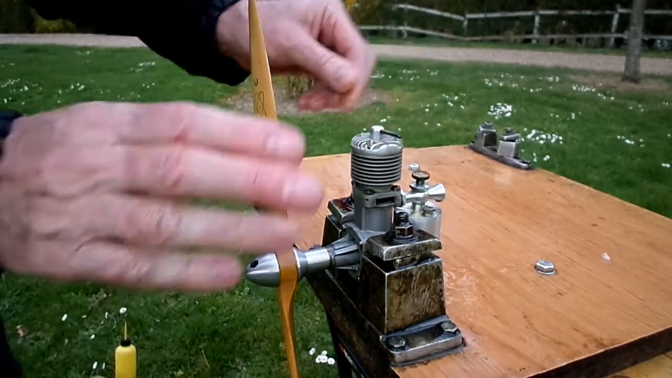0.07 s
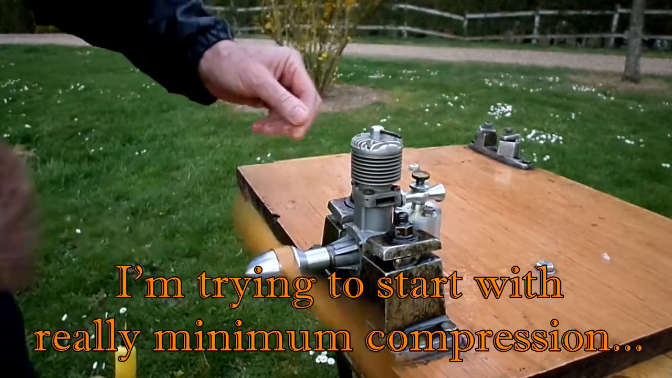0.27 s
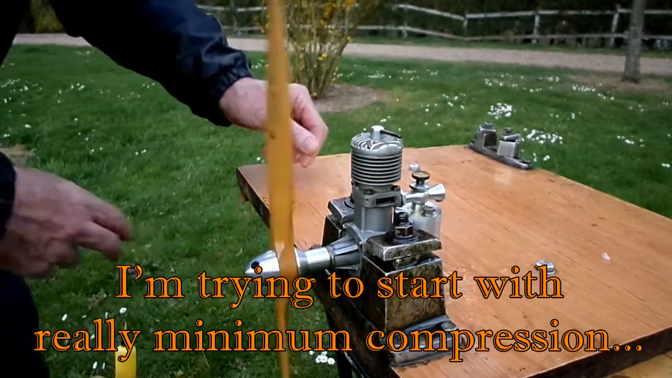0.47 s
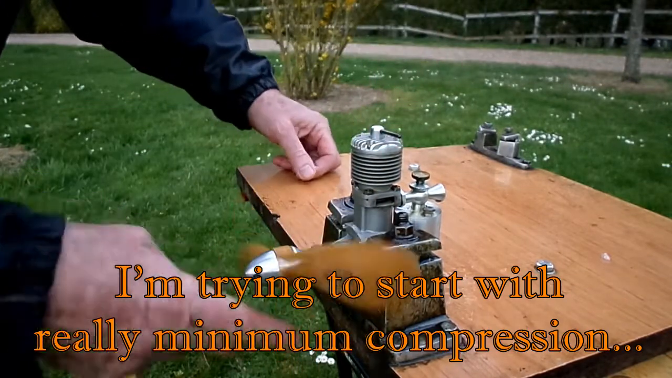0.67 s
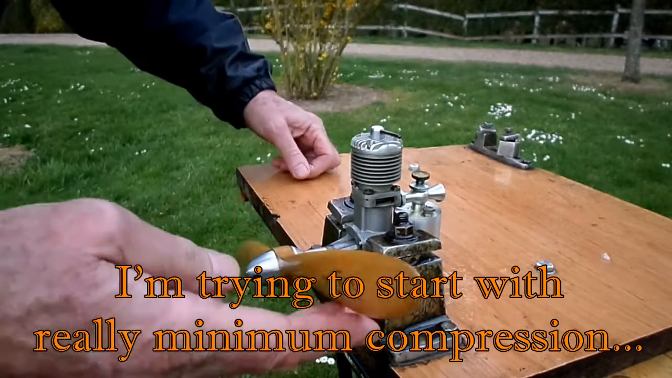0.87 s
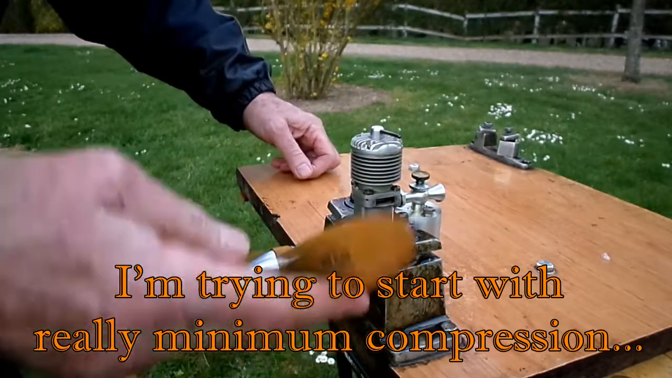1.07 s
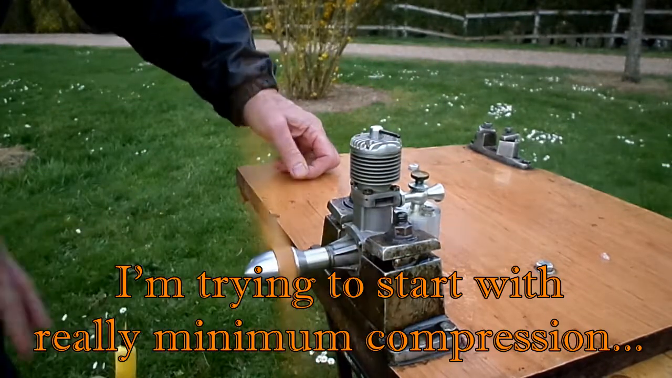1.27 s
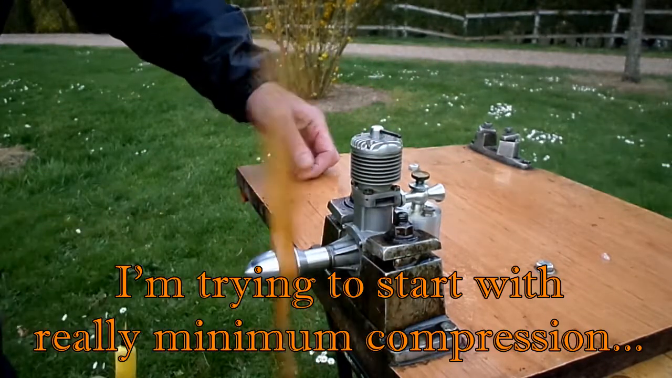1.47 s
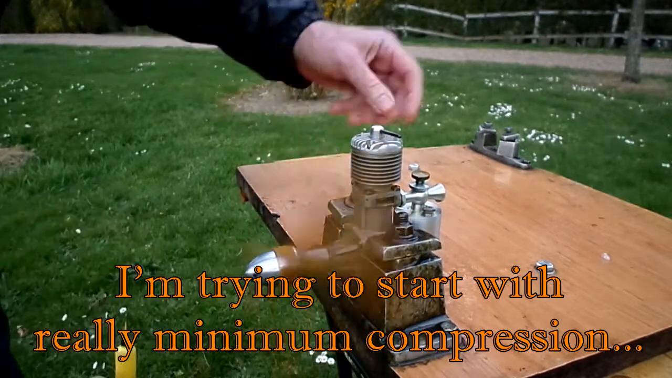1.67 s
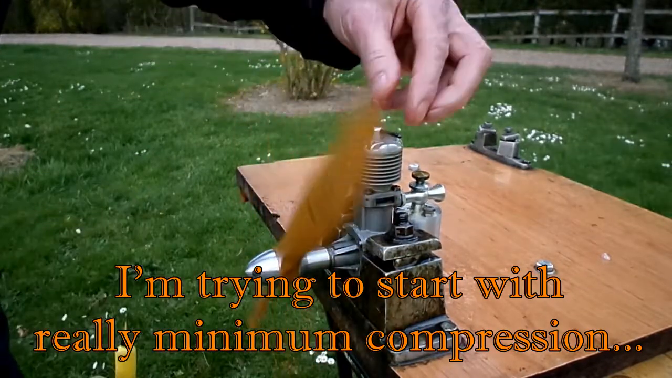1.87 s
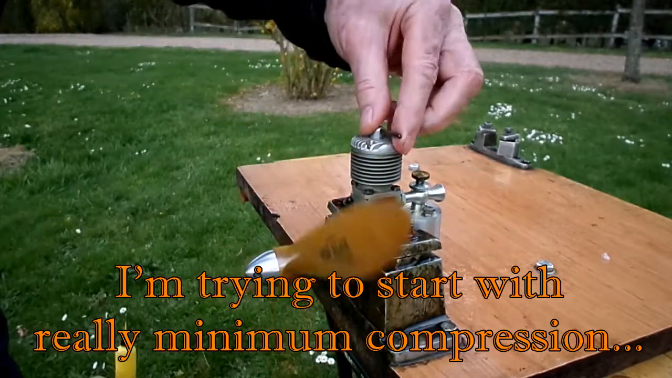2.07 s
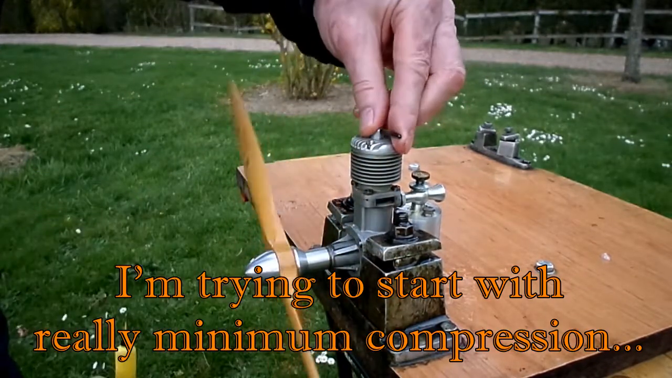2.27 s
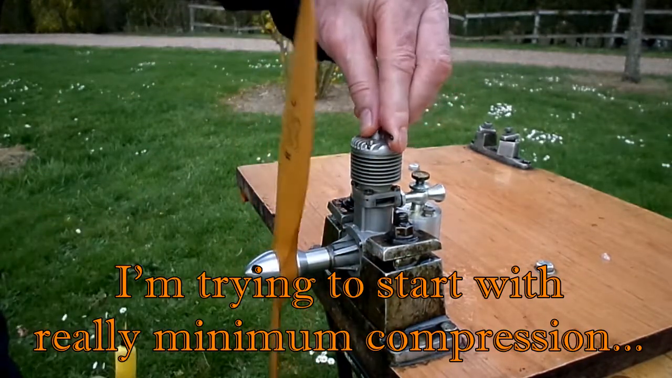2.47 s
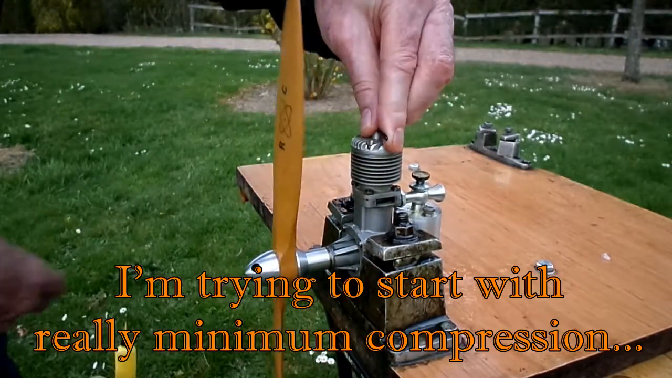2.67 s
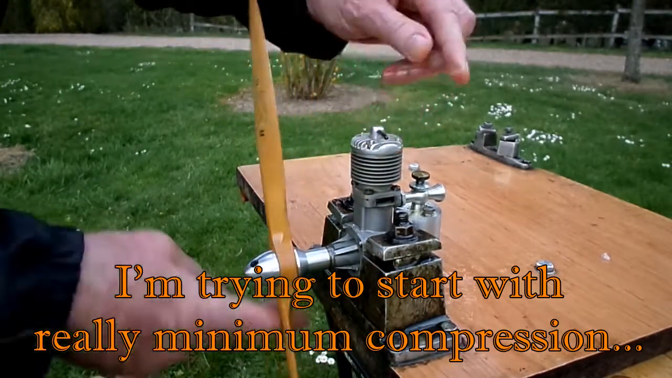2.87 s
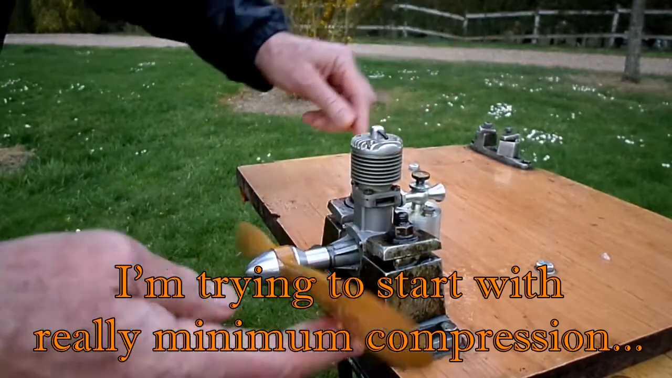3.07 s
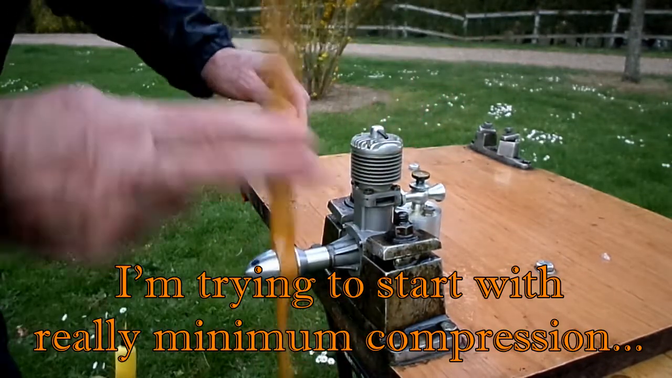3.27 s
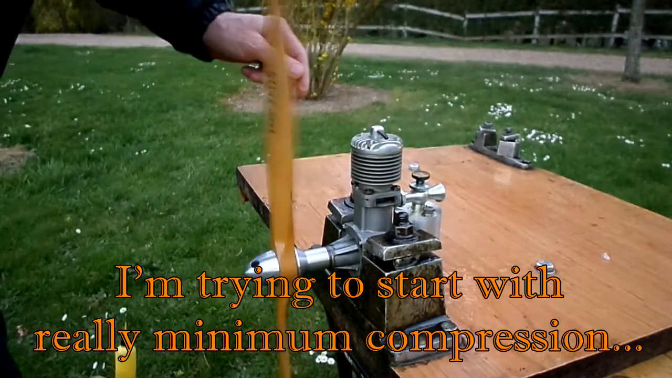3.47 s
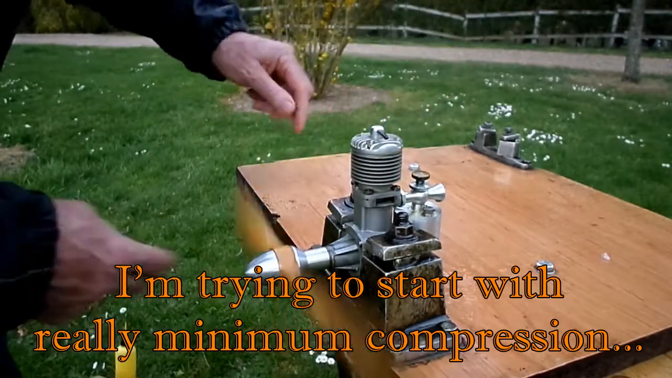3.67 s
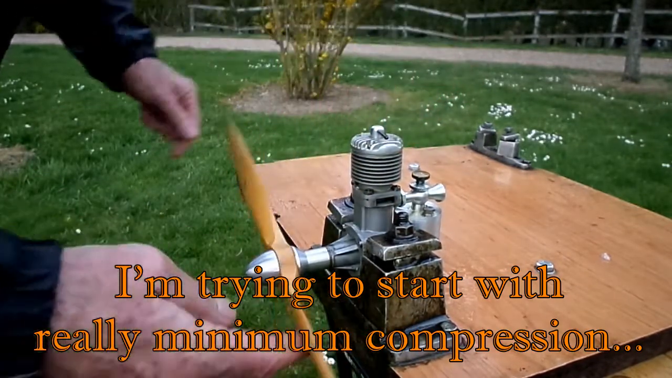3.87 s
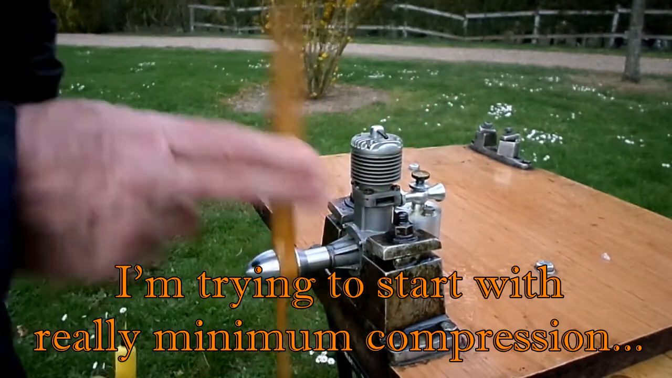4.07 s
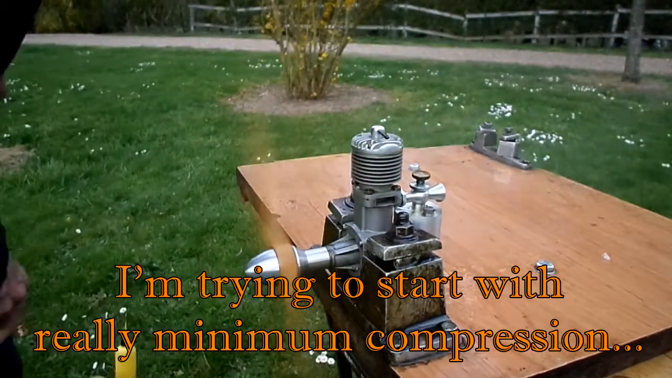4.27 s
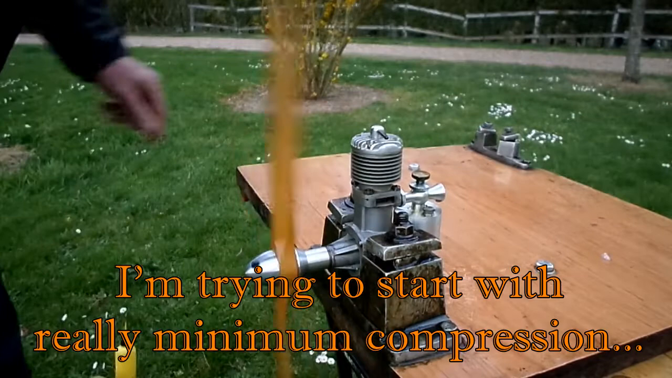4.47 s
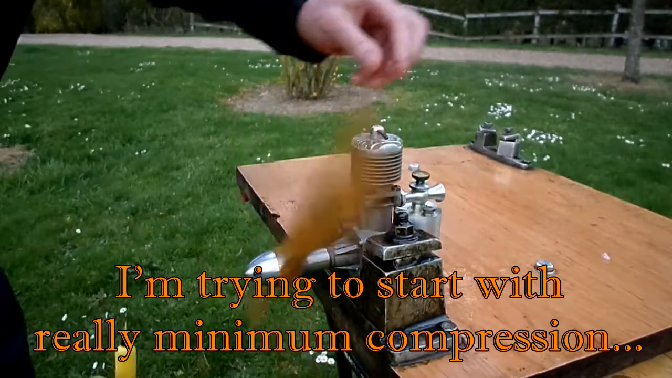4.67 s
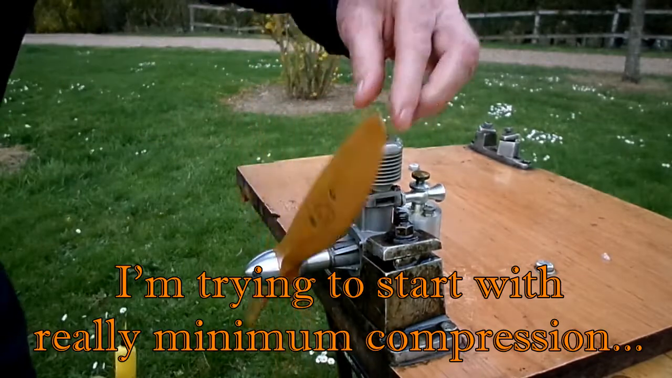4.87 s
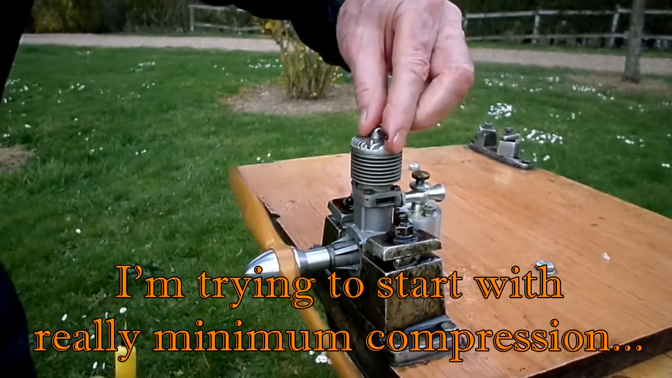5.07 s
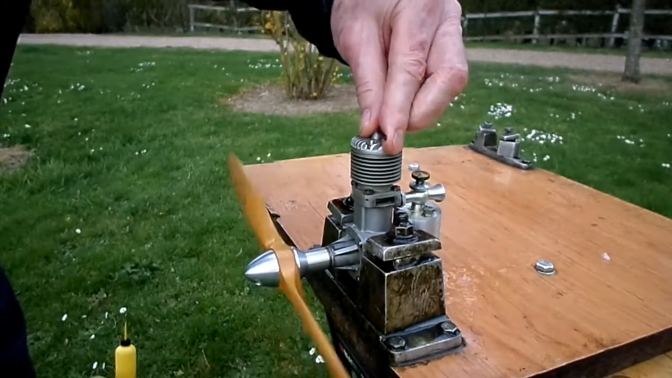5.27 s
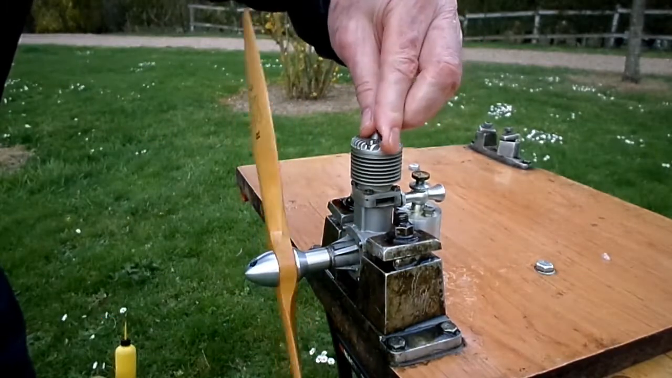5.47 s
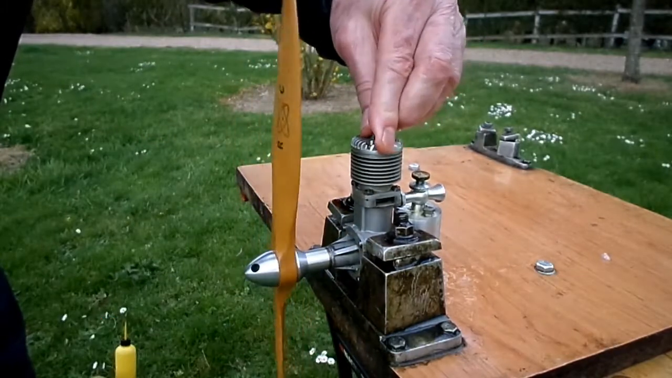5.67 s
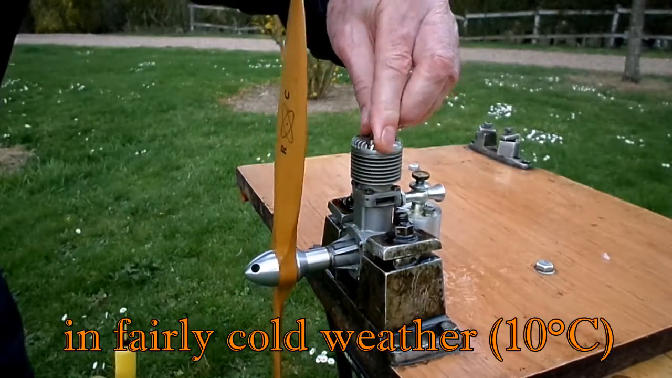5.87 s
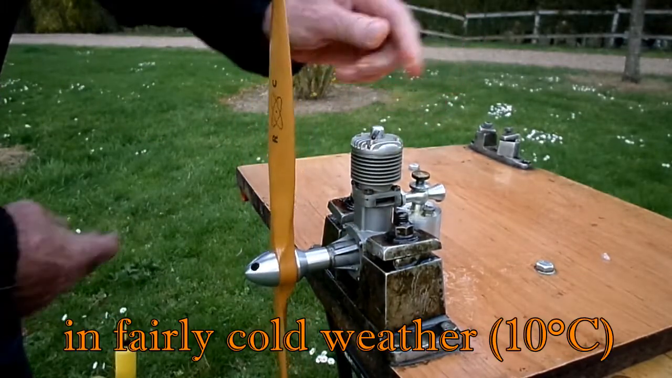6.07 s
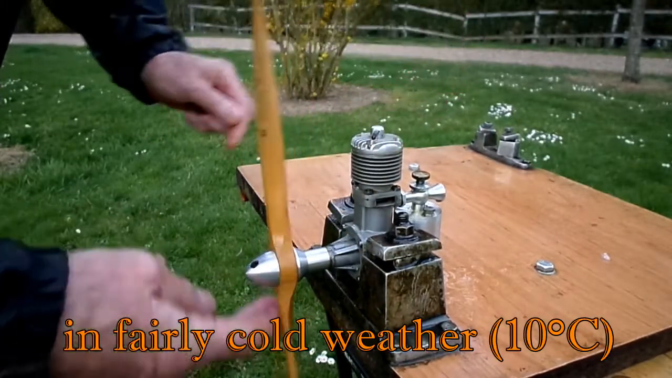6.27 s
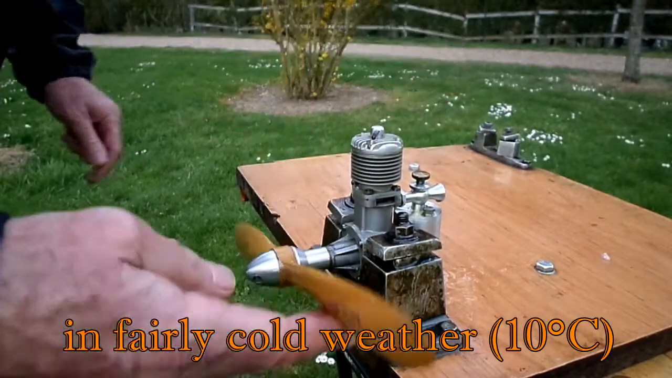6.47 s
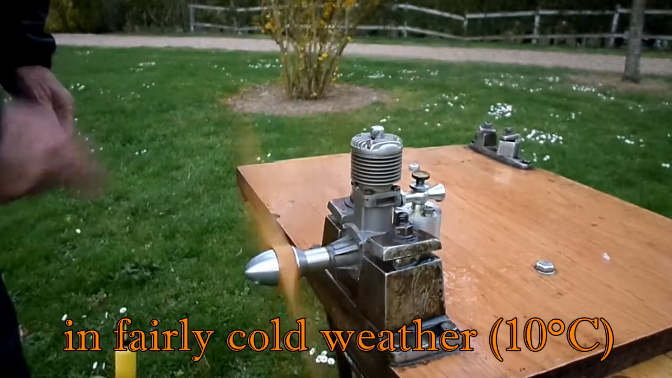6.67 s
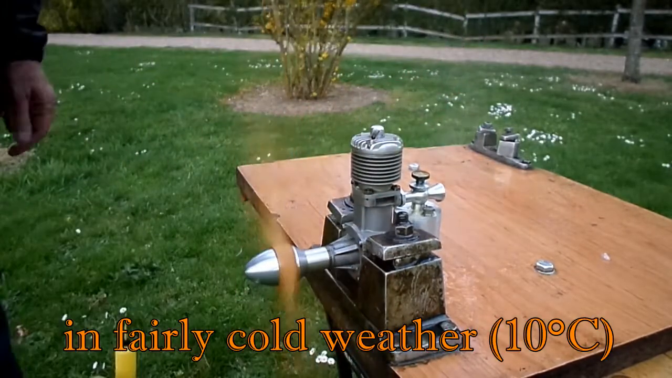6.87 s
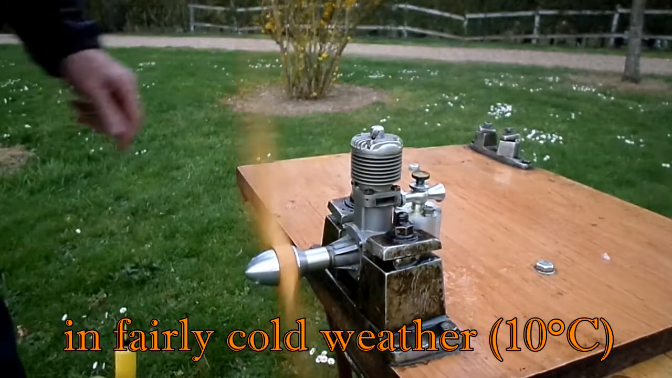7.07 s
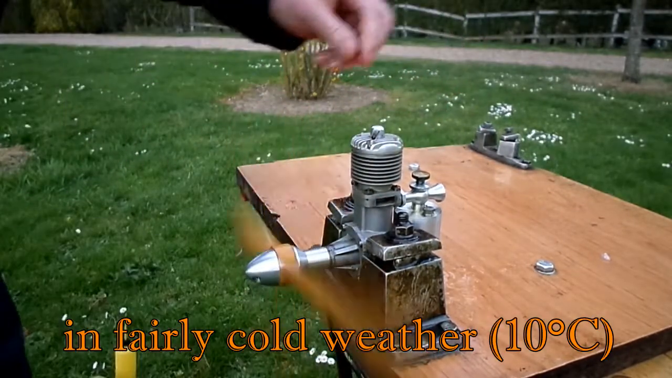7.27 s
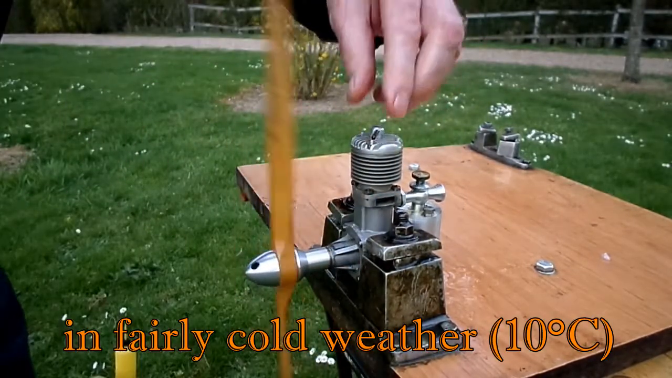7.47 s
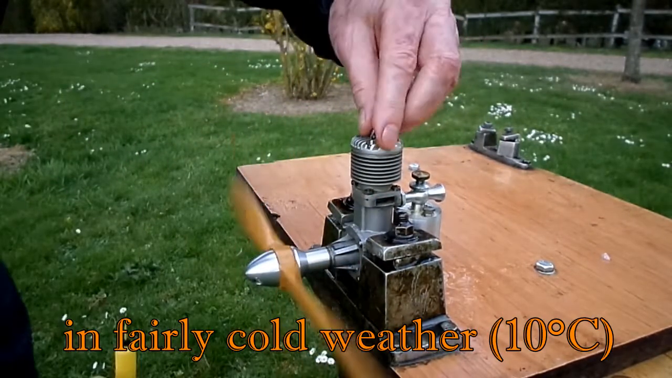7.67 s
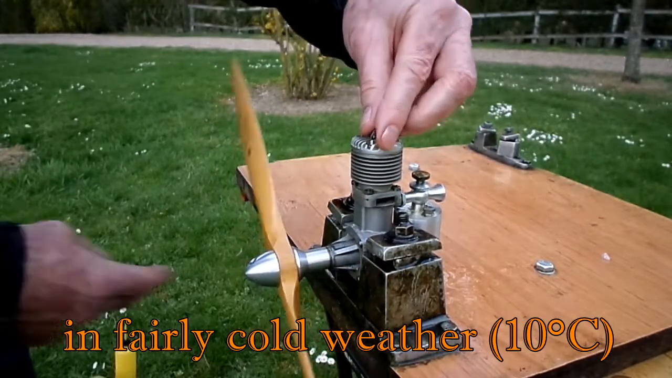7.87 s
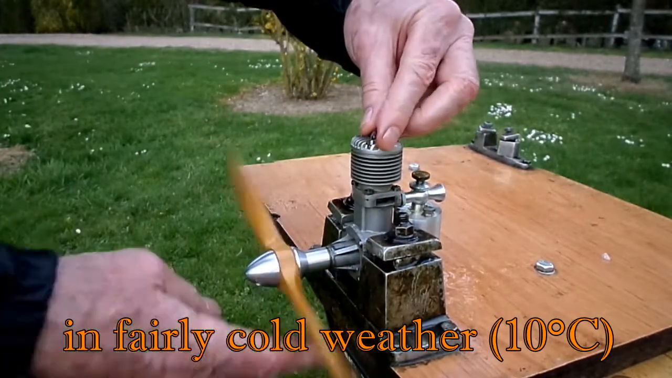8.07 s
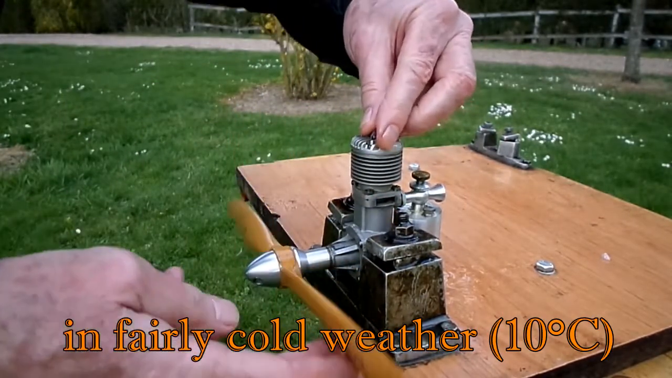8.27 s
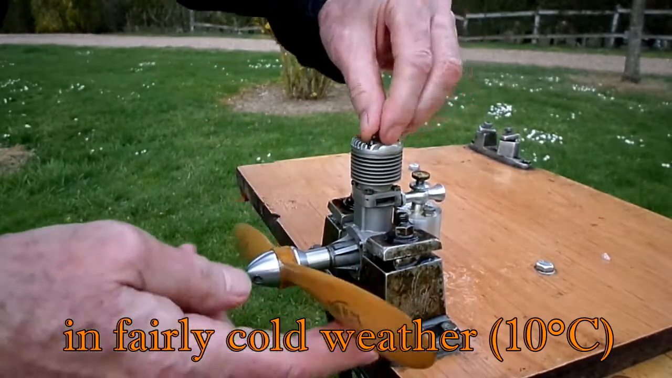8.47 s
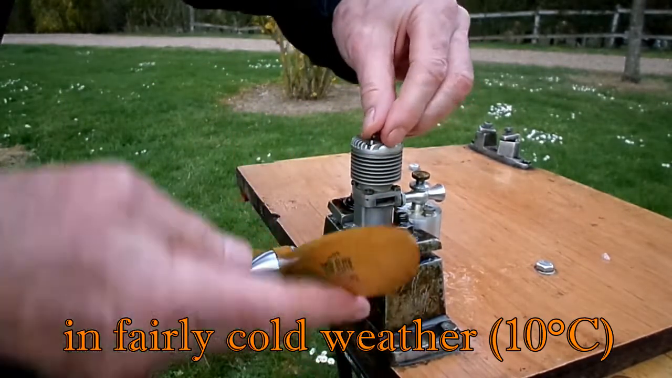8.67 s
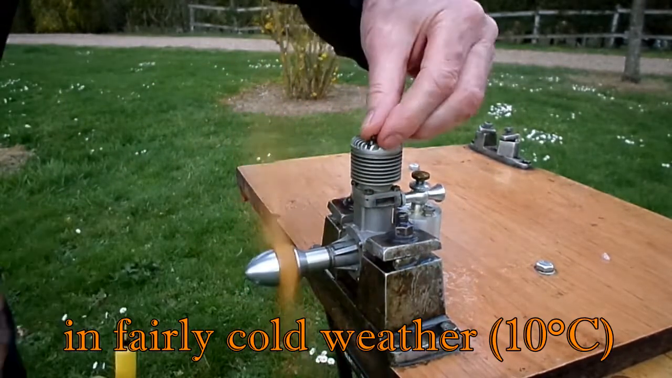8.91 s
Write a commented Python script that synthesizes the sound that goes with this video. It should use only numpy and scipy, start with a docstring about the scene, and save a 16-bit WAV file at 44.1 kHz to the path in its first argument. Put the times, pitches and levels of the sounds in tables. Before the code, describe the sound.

Outdoors in a quiet garden, a close microphone hears a small model engine on a wooden table. At first there are sleeve swishes, light finger knocks and metal ticks over a soft murmur and distant birds. At 1.2 s a flick gasps and fires about six hard, bright cracks, speeding up, then slackens into pops and whirr until about 1.7. Quiet, with a faint far drone around 3. At 3.35 a knock and one sharp bang, running down weakly. At 4.15 a stronger blade knock and seven rapid cracks, coasting out by 4.65. A pause has faint bird whistles, a clear one near 6, and sleeve rustle. At 6.65 the longest burst, fourteen fast cracks with propeller buzz, slows by 7.3 amid heavy low wind thumps. Near silence follows until a final gasp and burst at 8.8, cut off at about 8.9 while still firing.

```python
"""Hand-starting a small model engine

A model diesel on a wooden table in a garden is flicked by hand five times, firing for one to fourteen turns.
The intake gasps and the open exhaust cracks; after four of the starts the wooden propeller coasts down.
Fingers knock the blade, metal ticks, a nylon sleeve swishes, birds and a drone sound far off, and air buffets
the microphone. Shaped noise makes gas, cloth and wind; fading sines ring; a turn-by-turn crank times the engine."""
import sys
import numpy as np
from scipy import signal
from scipy.fft import rfft, irfft
from scipy.io import wavfile
from scipy.ndimage import uniform_filter1d

SR = 44100
rng = np.random.default_rng(int(sys.argv[2]) if len(sys.argv) > 2 else 0)


def waveform_to_disk(signal):
    """Save audio, clipped to [-1, 1], as 16-bit WAV at the path in sys.argv[1]."""
    frames = np.transpose(np.atleast_2d(signal))
    scaled = np.clip(frames, -1, 1) * 32767
    samples = np.round(scaled).astype(np.int16)
    wavfile.write(sys.argv[1], SR, samples)


N = 394254
TIME = np.arange(N) / SR
# time since the onset of a short sound (s)
AGE = np.arange(4096) / SR


# Levels in the tables are relative: a function may trim them as it mixes its layers.


def undb(db):
    """Turn decibels into gain."""
    return 10 ** (np.asarray(db) / 20)


def curve(rows):
    """Gain over time, drawn through rows of time_s, level_db."""
    return undb(np.interp(TIME, *np.transpose(rows)))


def noise(colour, size):
    """Noise of rms 1, its spectrum shaped by rows of frequency_hz, level_db."""
    hz, db = np.transpose(colour)
    bins_hz = np.fft.rfftfreq(size, 1 / SR)
    gain = undb(np.interp(np.log(bins_hz + 1), np.log(hz), db))
    x = irfft(rfft(rng.standard_normal(size)) * gain, size)
    return x / x.std()


def band(x, hz, kind, order=2):
    """Butterworth filter that keeps one part of the spectrum."""
    edges_hz = np.minimum(hz, SR / 2 - 100)
    return signal.sosfilt(signal.butter(order, edges_hz, kind, fs=SR, output="sos"), x)


def walk(rate):
    """Random wander: straight lines between random points, at this many points per second."""
    return np.interp(TIME * rate, np.arange(N // 10), rng.standard_normal(N // 10))


def swells(rows, rest_db):
    """Gain of swells that rise and fall evenly in dB, added as power over a resting level."""
    power = undb(rest_db) ** 2
    for peak_s, db, rise_s, fall_s in rows:
        drop = np.maximum((peak_s - TIME) / rise_s, (TIME - peak_s) / fall_s)
        power = power + undb(db - 20 * drop) ** 2
    return np.sqrt(power)


def sized(x, db):
    """Give a short sound the energy of 5 ms at this rms level."""
    return x * undb(db) / np.sqrt(np.sum(x ** 2) / (.005 * SR))


def fade(t60):
    """Exponential decay that drops 60 dB in t60 seconds."""
    return np.exp(-np.log(1000) * AGE / t60)


def ring(hz, t60):
    """One struck mode: a sine that dies away."""
    return np.sin(2 * np.pi * hz * AGE) * fade(t60)


def add(out, s, x):
    """Mix x into out, starting at s seconds."""
    i = max(int(s * SR), 0)
    out[i:i + len(x)] += x[:max(N - i, 0)]


def n_wave(length, edge_hz):
    """A pressure jump that falls through zero to a suction and snaps back, softened above edge_hz."""
    return band((1 - 2 * AGE / length) * (AGE < length), edge_hz, "low")


def jet(rise, t60):
    """Gas noise that builds as a port opens and then dies away."""
    # colour of rushing gas: frequency_hz, level_db
    gas_colour = [(300, -28), (1000, -9), (2200, -10), (4500, -10), (7000, -5.5), (9000, -3), (11000, 6),
                  (12500, -4.5), (15000, -12.5), (17000, -27)]
    return noise(gas_colour, len(AGE)) * (1 - np.exp(-(AGE / rise) ** 2)) * fade(t60)


def table_shake():
    """Stand and table top ring after a blow; pitch varies least in the low modes."""
    # modes of stand and table top: pitch_hz, level_db, t60_s
    wood_modes = [(140, -4.5, .07), (228, 0.5, 0.028), (370, -2.5, 0.031), (432, -9, 0.033),
                  (640, -33.5, 0.049), (710, -16, 0.035), (863, -3, .04), (1246, -15.5, 0.043),
                  (1750, -2, 0.017), (1930, 0, 0.022)]
    out = np.zeros(len(AGE))
    for hz, db, t60 in wood_modes:
        gain = undb(db + 2.1 * rng.standard_normal())
        out += gain * ring(hz * (1 + hz / SR * rng.standard_normal()), t60)
    return out


def garden():
    """Far outdoor murmur and a soft hiss behind it: two coloured noises with slowly moving levels."""
    # colour of the murmur: frequency_hz, level_db
    murmur_colour = [(20, 2.5), (120, 1), (250, -8), (400, -10), (1000, -9), (1600, -14), (3000, -19),
                     (6000, -26.5), (11000, -28), (15500, -34.5)]
    # murmur level over time, in groups: time_s, level_db
    murmur_level = [
        [(0.0, -55), (0.604, -57), (0.89, -60), (1.15, -60)],
        [(1.68, -71), (2.24, -70), (2.96, -57), (4.08, -56)],
        [(4.62, -67), (5.148, -68), (6.24, -54), (6.6, -55)],
        [(7.36, -76), (7.544, -78), (8.488, -71), (8.72, -67)],
    ]
    # level of the soft far hiss over time: time_s, level_db
    far_hiss_level = [(4.3, -86), (5, -75.5), (7, -73), (7.4, -95), (7.9, -76), (8.3, -75), (8.65, -66),
                      (8.94, -66)]
    hiss_colour = [(300, -27), (1000, 1), (1700, -0.5), (2800, -8.5), (6000, -25), (15000, -47)]
    # raised by 6 dB, with a small wander
    murmur = noise(murmur_colour, N) * curve(np.vstack(murmur_level)) * undb(6 + 1.1 * walk(8))
    return murmur + noise(hiss_colour, N) * curve(far_hiss_level)


def wind():
    """Air on the microphone: a low rumbling noise with single eddies as short bursts on top."""
    # colour of the rumble: frequency_hz, level_db
    wind_colour = [(15, 0), (35, -2), (70, -5.5), (130, -16), (250, -29.5), (600, -50), (2000, -102.5)]
    # strength of the breeze over time, in groups: time_s, level_db
    breeze_level = [
        [(0.0, -58), (1.46, -56), (1.82, -72), (3.2, -56)],
        [(4.6, -59), (5.728, -51), (5.978, -47), (6.4, -48)],
        [(6.5, -44), (6.614, -37), (7.194, -38), (7.3, -48)],
        [(7.38, -51), (7.996, -59), (8.356, -59), (8.94, -44)],
    ]
    # eddies that hit the microphone: centre_s, level_db, half_length_s, upper_edge_hz
    buffets = [(3.09, -45, 0.049, 204), (4.961, -34, 0.022, 118), (5.179, -35, 0.026, 128),
               (6.526, -28.5, 0.049, 120), (6.552, -32, 0.04, 98), (6.619, -27.5, 0.039, 128),
               (7.03, -23.5, 0.036, 360), (7.105, -22.5, 0.025, 340), (7.157, -23.5, 0.025, 262),
               (7.227, -22, 0.019, 398), (7.254, -19.5, 0.013, 442), (7.297, -13, 0.021, 345),
               (7.514, -24.5, 0.019, 480), (8.525, -37.5, 0.02, 180), (8.623, -37.5, 0.023, 200),
               (8.761, -18.5, 0.0047, 279)]
    out = noise(wind_colour, N) * curve(np.vstack(breeze_level)) * undb(1.8 + 1.9 * walk(10))
    for centre_s, db, half_s, hz in buffets:
        t = np.arange(-2 * half_s, 2 * half_s, 1 / SR)
        swell = np.exp(-(t / (0.71 * half_s)) ** 2)
        eddy_colour = [(hz / 10, -6), (hz / 2.8, 0), (hz * .8, -6), (hz * 1.7, -25), (hz * 5, -65),
                       (hz * 30, -100)]
        # the core of the eddy is faster and reaches higher
        core_colour = [(hz / 2, -15), (hz, 0), (hz * 2, -9), (hz * 4.25, -24), (hz * 9, -55), (hz * 30, -80)]
        eddy = noise(eddy_colour, len(t)) * swell
        core = noise(core_colour, len(t)) * swell ** 4
        gust = (eddy + undb(-11) * core) / eddy.std()
        add(out, centre_s - 2 * half_s, gust * undb(db - 6.5))
    return out


def birds():
    """Birds far off: gliding, trilling sine whistles, smeared by the trees on their way."""
    # bird notes: start_s, end_s, start_hz, middle_hz, end_hz, level_db, warble (share of pitch)
    bird_notes = [(0, 0.136, 2330, 2380, 2180, -53, 0.028), (0.6, 0.814, 2270, 2450, 2300, -54, 0.02),
                  (0.91, 1.17, 1666, 1700, 1730, -64, 0.0092),
                  (2.171, 2.335, 1700, 1970, 1836, -67, 0.0056),
                  (2.397, 2.57, 2410, 2380, 2320, -59.5, 0.027),
                  (3.664, 3.772, 2090, 2030, 1950, -53, .005), (3.89, 4.02, 2380, 2400, 2170, -52.5, 0.011),
                  (4, 4.112, 2220, 2110, 2060, -48, 0.04), (4.82, 4.924, 2150, 2510, 2400, -63.5, 0.0084),
                  (4.88, 5.1, 2300, 2320, 2390, -61.5, 0.16), (5.032, 5.255, 1700, 1967, 1950, -66, .005),
                  (5.234, 5.29, 4730, 4600, 4550, -64.5, .003), (5.27, 5.445, 3240, 3350, 3340, -69, .005),
                  (5.331, 5.693, 2227, 2300, 2354, -62.5, .012),
                  (5.454, 5.483, 2760, 2885, 2830, -63, 0.0033),
                  (5.465, 5.546, 4420, 4320, 4440, -54.5, 0.0021),
                  (5.602, 5.803, 1800, 1740, 1780, -59, 0.049),
                  (5.658, 5.73, 3700, 4800, 6860, -68.5, 0.0043),
                  (5.719, 5.856, 6150, 5420, 5860, -62.5, .004),
                  (5.909, 6.176, 2690, 2563, 2580, -49.5, 0.0035)]
    out, quaver, swell = np.zeros(N), walk(160), walk(40)
    for start_s, end_s, first_hz, middle_hz, last_hz, db, warble in bird_notes:
        now = (TIME >= start_s) & (TIME < end_s)
        progress = np.linspace(0, 1, now.sum())
        glide = np.polyfit([0, .5, 1], [first_hz, middle_hz, last_hz], 2)
        # a fast, slightly uneven trill of 60 beats a second rides on the glide
        trill = np.sin(2 * np.pi * 60 * TIME[now]) + .4 * quaver[now]
        hz = np.polyval(glide, progress) * (1 + warble * trill)
        loudness = np.sqrt(np.abs(np.sin(np.pi * progress))) * undb(db + 2 * swell[now])
        out[now] += np.sin(np.cumsum(2 * np.pi * hz / SR)) * loudness
    t = TIME[:SR // 2]
    trees = rng.standard_normal(len(t)) * (np.exp(-t / .012) + .25 * np.exp(-t / 0.12))
    echoes = signal.fftconvolve(out, trees / np.linalg.norm(trees))[:N]
    return .85 * out + .55 * echoes


def sleeve():
    """A nylon sleeve swishes with arm movements: cloth-coloured noise with an uneven level."""
    # colour of the cloth: frequency_hz, level_db
    cloth_colour = [(300, -27), (1500, -12), (4000, -11), (6500, -7.5), (9000, -6.5), (11200, 2),
                    (13000, -8.5), (15000, -15), (16000, -41.5)]
    # arm movements: peak_s, level_db, rise_s (to climb 20 dB), fall_s (to drop 20 dB)
    swishes = [(.05, -38.5, .4, .25), (.245, -39, .06, .07), (.345, -39.5, .06, .07),
               (.59, -45.5, .12, .25), (.78, -50, .25, .35), (1.19, -35, .065, .07), (1.62, -65, .3, .5),
               (1.88, -67, .4, .25), (2.3, -61, .22, .3), (2.83, -38.5, .33, .25), (3.3, -40, .09, .3),
               (3.74, -42.5, .4, .21), (4.11, -38.5, .1, .15), (4.6, -61, .4, .45), (6.02, -41, .17, .4),
               (6.2, -41, .3, .35), (6.42, -56, .2, .5), (6.63, -40.5, .09, .3), (7.3, -70, .3, .4),
               (7.95, -54.5, .33, .13), (8.76, -48, .05, .4)]
    return noise(cloth_colour, N) * swells(swishes, rest_db=-77) * undb(walk(45))


def drone():
    """A far-off hum that swells and fades: narrow filtered noise, so it wavers."""
    # swells of the drone: peak_s, level_db, rise_s (to climb 20 dB), fall_s (to drop 20 dB)
    drone_swells = [(1.1, -67, 2.0, 1.0), (3.05, -55.5, .85, 1.6)]
    hum = band(rng.standard_normal(N), [292, 314], "band", order=3)
    return hum / hum.std() * swells(drone_swells, rest_db=-86)


def knocks():
    """Fingers on the blade and play in the crank: short band-passed noise with a low table ring."""
    # knocks: start_s, level_db, centre_hz
    blade_knocks = [(0.237, -35, 480), (0.294, -35.5, 715), (0.353, -43.5, 397), (0.632, -41.5, 330),
                    (2.924, -34.5, 670), (3.014, -40, 1490), (3.073, -38, 333), (3.219, -39.5, 970),
                    (3.338, -18, 340), (3.605, -36, 800), (3.661, -42, 650), (3.778, -31, 637),
                    (3.882, -44, 300), (4.141, -19, 600), (5.8, -45, 1780), (6.301, -29.5, 650)]
    out = np.zeros(N)
    for s, db, hz in blade_knocks:
        touch = band(rng.standard_normal(len(AGE)), [hz * .45, hz * 1.44], "band", order=4) * fade(t60=0.065)
        shake = band(table_shake(), 1200, "low")
        add(out, s - .001, sized(touch, db - .5) + sized(shake, db - 4))
    return out


def ticks():
    """Sharp metal ticks: very short bursts of bright noise."""
    # ticks: start_s, level_db
    metal_ticks = [(0.525, -41), (0.789, -38), (1.46, -38), (1.98, -57), (2.213, -53.5), (3.07, -41.5),
                   (3.393, -31), (3.774, -19), (4.392, -42), (4.895, -53.5), (4.968, -56), (5.248, -50),
                   (6.305, -36.5), (8.225, -59.5)]
    out = np.zeros(N)
    for s, db in metal_ticks:
        add(out, s, sized(jet(rise=0.0003, t60=0.018), db + .6))
    return out


def settle(first_db, last_db, turn, turns):
    """A level that eases exponentially from first to last, with a time constant in turns."""
    return last_db + (first_db - last_db) * np.exp(-turn / turns)


def crank():
    """Turn by turn, burns push the speed towards its top, then drag wears it down; lists burns, puffs, gasps."""
    # one row per start: first_burn_s, first_speed (turns per s), top_speed (turns per s),
    # gain (share of the gap to top speed won per burn), loss (turns per s lost per coasting turn),
    # burn_count, coasting_turn_count, burn_db, first_pop_db, first_hiss_db, first_gasp_db,
    # cavity_hz, cavity_db (over the blast)
    starts = [(1.2501, 23.853, 44.731, .4042, 7.383, 6, 5, -12.3, -40, -34, -16.5, 2120, -6),
              (3.3513, 33.233, 48, .35, 8.219, 1, 4, -9.6, -26, -15, -17, 2380, -8.5),
              (4.1546, 31.806, 49.203, .2919, 6.827, 7, 6, -11, -29, -31, -23, 2020, -8),
              (6.6888, 24.671, 53.747, .2097, 6.407, 14, 7, -12.5, -28, -29, -22, 2230, -2.5),
              (8.8045, 29.589, 58.845, .1921, 7, 6, 0, -15.8, -40, -31, -35, 2296, -5)]
    # delay from exhaust opening to intake opening: speed (turns per s), lag (share of a turn)
    intake_lag = [(13, .46), (35, .58)]
    # slowest turn that still carries the piston over compression (turns per s)
    slowest_turn = 12.4
    # above this speed the cylinder fills less well and each burn weakens (turns per s)
    full_charge_speed = 31
    burns, puffs, gasps = [], [], []
    for (s, speed, top, gain, loss, firing, coasting, burn_db, first_pop_db, first_hiss_db, first_gasp_db,
         cavity_hz, cavity_db) in starts:
        firing, total = round(firing), round(firing + coasting)
        for turn in range(total):
            if turn < firing:
                burns.append((s, burn_db, max(speed - full_charge_speed, 0), cavity_hz, cavity_db))
            else:
                idle = turn - firing
                # pops also lose 1.3 dB per turn as the engine runs down
                pop_db = settle(first_pop_db, -40.5, idle, turns=1.2) - 1.3 * idle
                puffs.append((s, pop_db, settle(first_hiss_db, -30.8, idle, turns=3.2)))
            if turn + 1 < total:
                gasp_db = settle(first_gasp_db, -31.8, turn, turns=2.3) + 1.6 * rng.standard_normal()
                gasps.append((s + np.interp(speed, *np.transpose(intake_lag)) / speed, gasp_db))
            s += 1 / speed
            if turn + 1 < firing:
                speed = speed + gain * (top - speed)
            else:
                speed = max(speed - loss, slowest_turn)
    return burns, puffs, gasps


def rotation(strokes):
    """Turns made over time: the crank turns once between port openings, smoothed a little."""
    times = np.sort([row[0] for row in strokes])
    return uniform_filter1d(np.interp(TIME, times, np.arange(len(times))), size=1200)


def effort(speed, burns):
    """Strength of the propeller wash: it grows with speed and surges as each burn kicks the blades."""
    # wash at 45 turns a second, and surge against the burn level (dB)
    wash_db, surge_db = -38.6, -10.5
    # how much each extra turn per second weakens the surge (dB)
    surge_sag_db = .9
    # the surge starts ahead of the port opening, then builds and decays (s)
    lead_s, rise_s, decay_s = .011, .009, .038
    surge_power = np.zeros(N)
    t = TIME[:SR // 2]
    kick = (1 - np.exp(-t / rise_s)) * np.exp(-t / decay_s)
    for s, burn_db, overspeed, _, _ in burns:
        gain = undb(burn_db + surge_db - surge_sag_db * overspeed)
        add(surge_power, s - lead_s, (gain * kick) ** 2)
    steady = undb(wash_db) * speed ** 2.2
    return np.sqrt(surge_power + steady ** 2)


def propeller(turns, speed, wash):
    """Two blades beat the air into tones that waver in the eddies, and churn it into pulsing noise."""
    # colour of the churned air: frequency_hz, level_db
    churn_colour = [(25, -17.5), (70, -9), (150, -3.5), (350, 4.5), (700, -0.5), (1200, -11.5),
                    (2100, -15.5), (3500, -22.5), (7000, -15), (11000, -16.5), (15000, -37)]
    # blade tones: multiple (of the crank rate), peak_db (at 45 turns a second)
    blade_tones = [(2, -33), (4, -42.5), (6, -43.5), (8, -44.5)]
    angle = 2 * np.pi * turns
    churn = band(noise(churn_colour, N), 190, "high") * (1 + .4 * np.cos(2 * angle))
    tones = np.zeros(N)
    for multiple, db in blade_tones:
        tones += undb(db + 1.5 * walk(40)) * np.cos(multiple * angle + .4 * walk(40))
    return 0.78 * wash * churn + speed ** 2 * tones


def clatter(wash):
    """Play in the connecting rod and bearings ticks at random moments, harder with a stronger wash."""
    out = np.zeros(N)
    for i, size in zip(rng.integers(0, N, size=900), rng.standard_normal(size=900)):
        if wash[i] > undb(-60):
            tick = sized(jet(rise=.0001, t60=0.0073), -2) + sized(table_shake(), -12)
            add(out, i / SR, wash[i] * undb(3 * size) * tick)
    return out


def intake_gasps(gasps):
    """The crankcase gulps air: a soft-edged jet of noise, cut off within a few milliseconds."""
    # gulps as the blade is flicked or swings back: start_s, level_db
    lone_gasps = [(1.214, -18), (1.224, -22.5), (3.325, -18), (3.336, -10), (4.127, -16.5), (4.139, -7),
                  (6.645, -17), (7.294, -32), (8.771, -29.5)]
    out = np.zeros(N)
    for s, db in gasps + lone_gasps:
        gulp = jet(rise=0.0065, t60=.03) * np.exp(-(AGE / .006) ** 4)
        add(out, s - .001, sized(gulp, db + 1.26))
    return out


def firings(burns):
    """Each burn: an ignition knock, then a shock from the opening port, a gas crack and a cavity ring."""
    # bright ringing near 11 kHz: pitch_hz, level_db, t60_s
    treble_modes = [(10000, -8, .025), (11000, 0, 0.025), (11700, -1, 0.026)]
    # weakening per extra turn per second, and scatter from burn to burn (dB)
    blast_sag_db, crack_sag_db, scatter_db = .15, .3, .5
    out = np.zeros(N)
    for s, burn_db, overspeed, pitch_hz, cavity_db in burns:
        chance = rng.standard_normal(5)
        blast_db = burn_db - blast_sag_db * overspeed + scatter_db * chance[2]
        crack_db = burn_db + 4.3 - crack_sag_db * overspeed + scatter_db * chance[3]
        # the ring's pitch varies a little from burn to burn
        pitch_scatter = 1 + .008 * chance[1]
        cavity_hz = pitch_hz * pitch_scatter
        ring_db = blast_db + cavity_db
        # the charge lights near top dead centre, a fraction of a turn before the port opens
        knock = sized(table_shake(), blast_db - 20.5) + sized(ring(cavity_hz, t60=0.053), ring_db - 22)
        add(out, s - .0045, knock)
        add(out, s - .0015, sized(jet(rise=.002, t60=0.011), crack_db - 20))
        # shock
        length = .00095 * (1 + .05 * chance[0])
        add(out, s - .00005, sized(n_wave(length, edge_hz=6400), blast_db + 0.22))
        # gas crack: overspeed shortens its decay, and a steeper cutoff ends it
        crack_t60 = .021 * np.exp(.2 * chance[4] - overspeed / 40)
        crack = jet(rise=.00012, t60=crack_t60) * np.exp(-(AGE / .005) ** 4)
        add(out, s + .0001, sized(crack, crack_db - .3))
        treble_ring = sum(undb(db) * ring(hz, t60) for hz, db, t60 in treble_modes)
        add(out, s + .0003, sized(treble_ring, crack_db - 12))
        # the cavity sings for as long as gas flows through it
        flow = np.exp(-(AGE / .003) ** 2)
        cavity = ring(cavity_hz, t60=.04) * flow
        low_cavity = (ring(1720 * pitch_scatter, t60=0.09) + ring(1250 * pitch_scatter, t60=0.0067)) * flow
        add(out, s + length - .0001, sized(cavity, ring_db - 0.5))
        add(out, s + length - .0001, sized(low_cavity, blast_db - 7.5))
        add(out, s, sized(table_shake(), blast_db - 3.5))
    return out


def port_puffs(puffs):
    """Weak last burns and unfired turns: the port pops and hisses, with a weak pressure wave and dull rings."""
    # the piston is flicked or rocks back past the open port: start_s, pop_db, hiss_db
    lone_puffs = [(1.699, -58.5, -64), (1.819, -65, -61), (4.647, -59.5, -59), (6.654, -31, -15.5),
                  (8.781, -35, -34)]
    out = np.zeros(N)
    for s, pop_db, hiss_db in puffs + lone_puffs:
        add(out, s, sized(n_wave(length=0.00123, edge_hz=2340), pop_db + 3.5))
        dull_gas = band(jet(rise=.001, t60=0.053), [350, 2200], "band")
        add(out, s, sized(dull_gas, pop_db + 2.5))
        # the cavity rings dully
        add(out, s, sized(table_shake(), pop_db + 8) + sized(ring(2020, t60=.022), pop_db))
        add(out, s + .0005, sized(jet(rise=0.0042, t60=0.0077), hiss_db + 0.67))
    return out


def engine():
    """Engine and propeller; delayed copies of the engine bounce off table top, operator and ground."""
    burns, puffs, gasps = crank()
    turns = rotation(burns + puffs)
    # 1 means 45 turns a second
    speed = np.abs(np.gradient(turns)) * SR / 45
    wash = effort(speed, burns)
    body = intake_gasps(gasps) + firings(burns) + port_puffs(puffs) + clatter(wash)
    # the engine's direct sound keeps little below 170 Hz
    direct = band(body, 170, "high")
    out = direct + propeller(turns, speed, wash)
    for delay_s, db in [(.0018, -20.5), (.0047, -21.5), (.0075, -26)]:
        add(out, delay_s, undb(db) * direct)
    return out


def scene():
    """Everything at the one microphone."""
    hands = sleeve() + knocks() + ticks()
    return (garden() + wind() + birds() + hands + drone() + engine())[None]


def record(dry):
    """Softly flatten the tallest peaks below a ceiling, then cut the treble above 16 kHz."""
    ceiling, top_hz = 0.84, 16000
    held = dry / (1 + (dry / ceiling) ** 4) ** (1 / 4)
    return signal.sosfilt(signal.ellip(8, .2, 70, top_hz, fs=SR, output="sos"), held)


dry = scene()
out = record(dry)
waveform_to_disk(out)
```